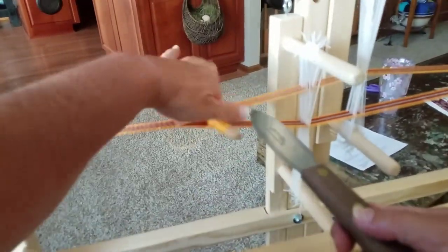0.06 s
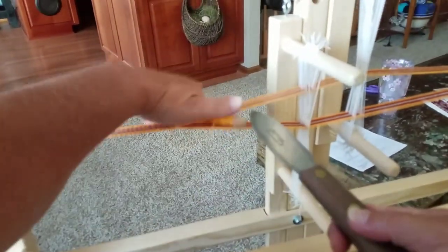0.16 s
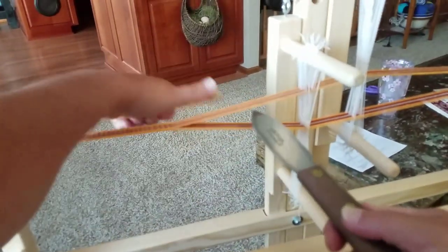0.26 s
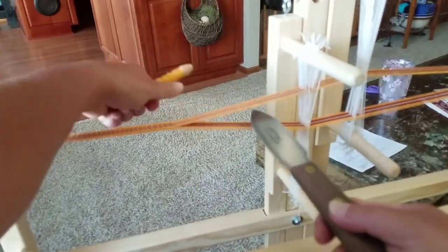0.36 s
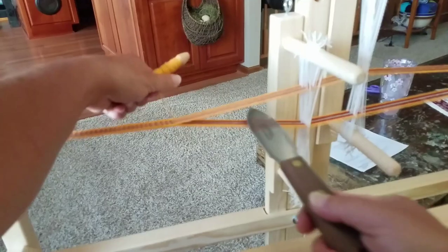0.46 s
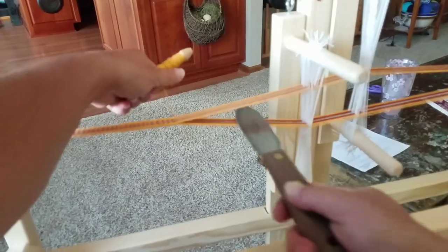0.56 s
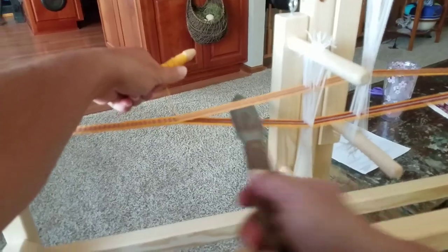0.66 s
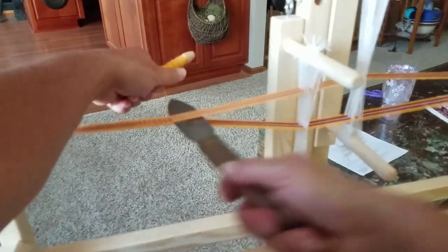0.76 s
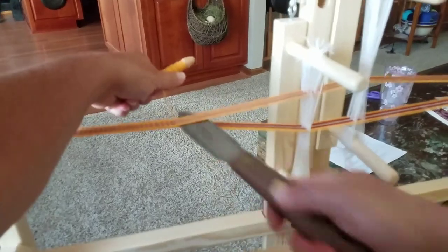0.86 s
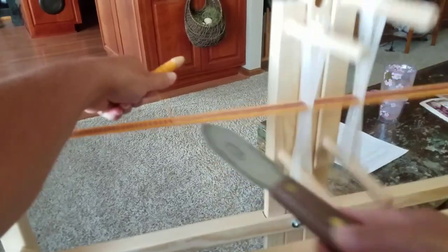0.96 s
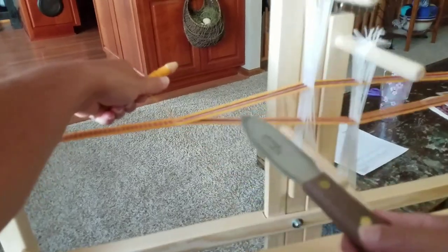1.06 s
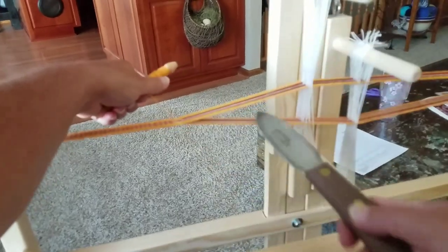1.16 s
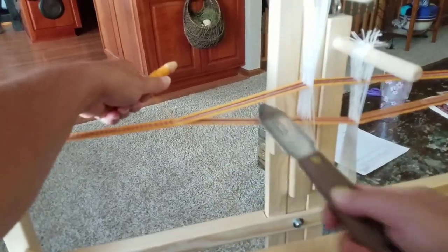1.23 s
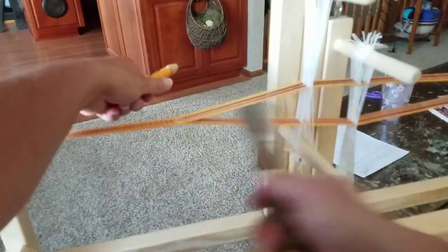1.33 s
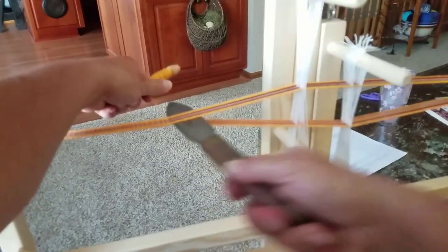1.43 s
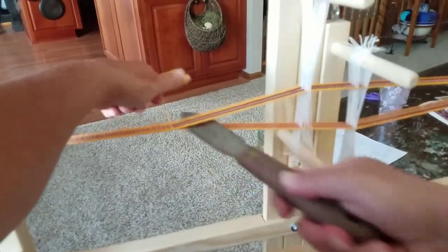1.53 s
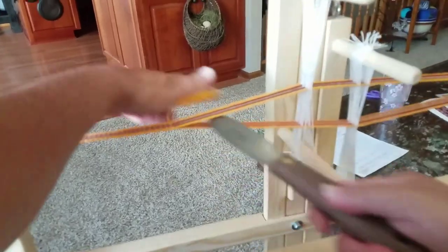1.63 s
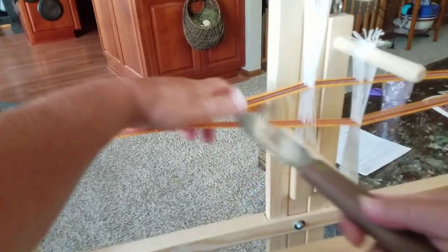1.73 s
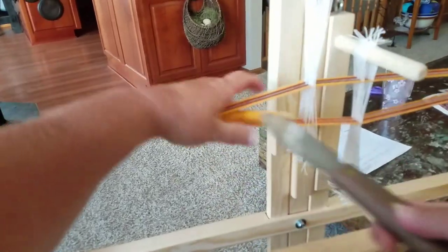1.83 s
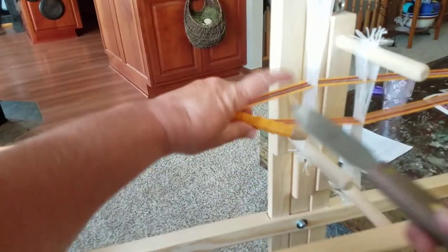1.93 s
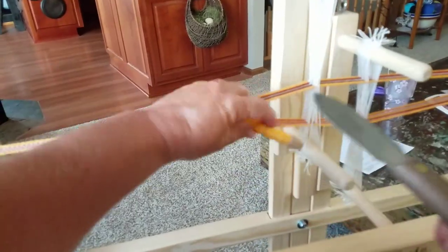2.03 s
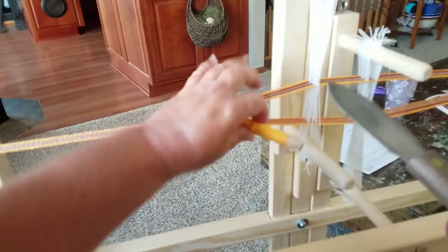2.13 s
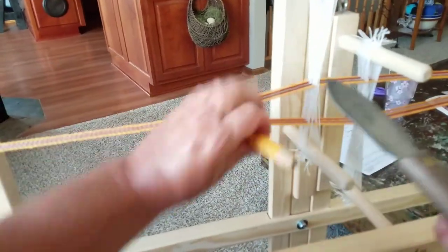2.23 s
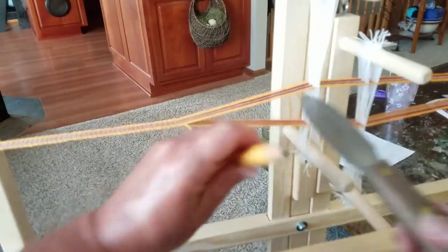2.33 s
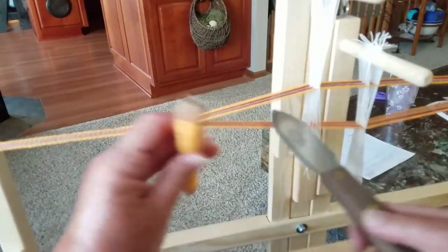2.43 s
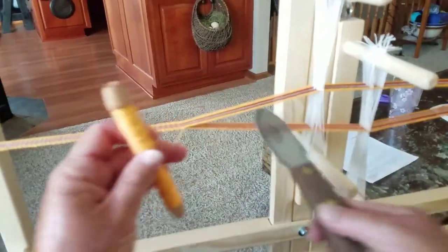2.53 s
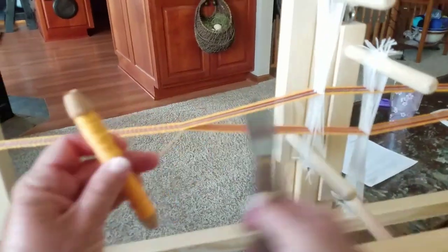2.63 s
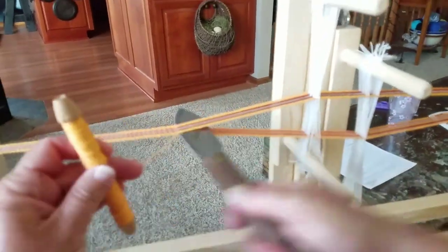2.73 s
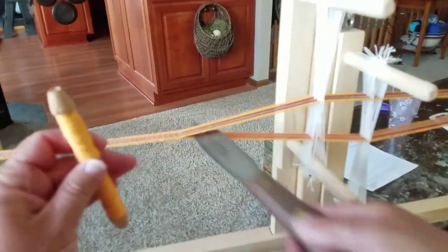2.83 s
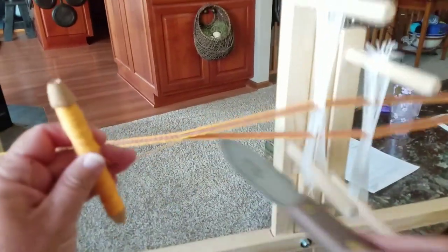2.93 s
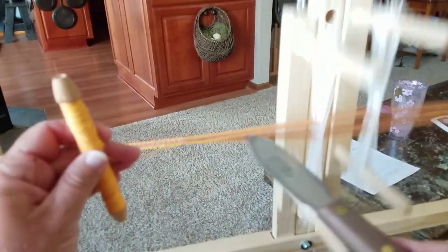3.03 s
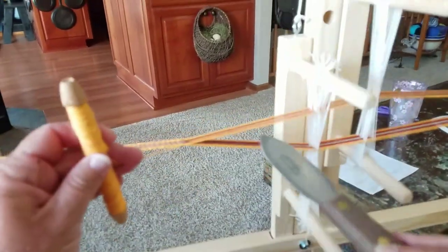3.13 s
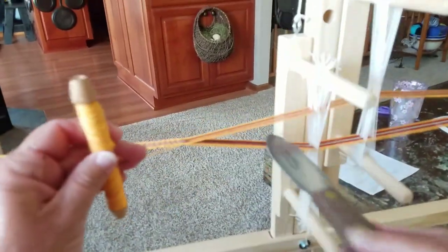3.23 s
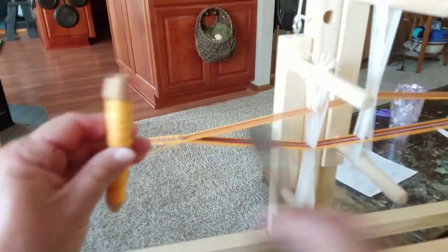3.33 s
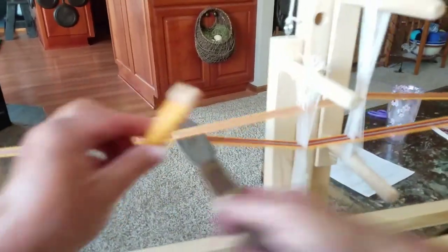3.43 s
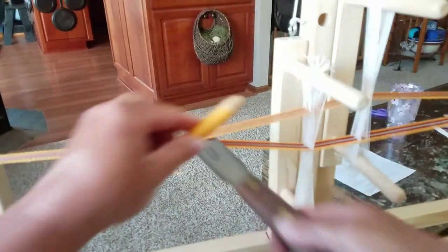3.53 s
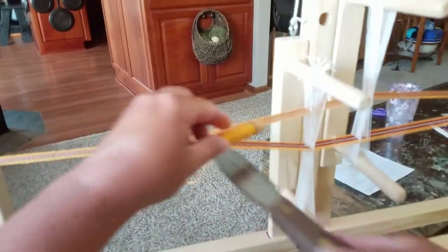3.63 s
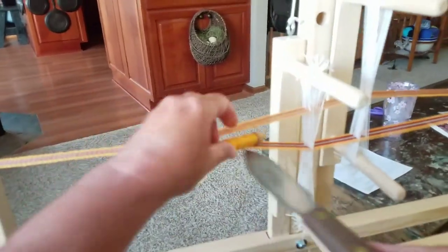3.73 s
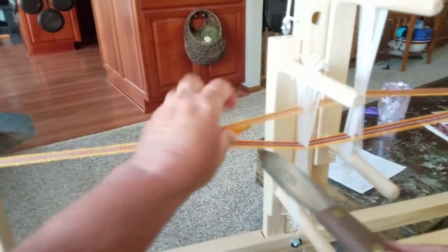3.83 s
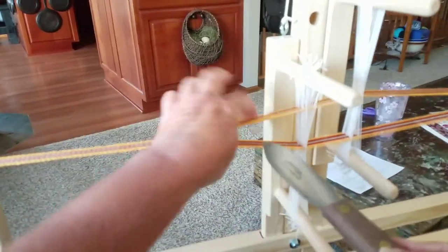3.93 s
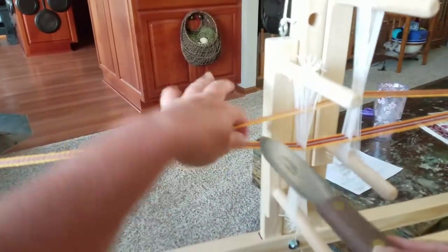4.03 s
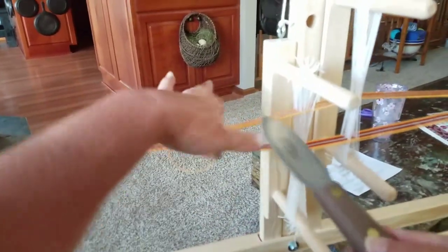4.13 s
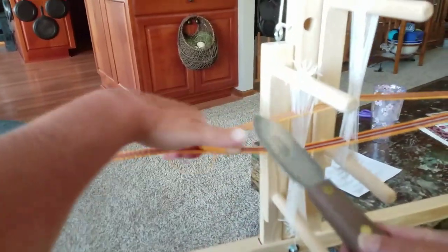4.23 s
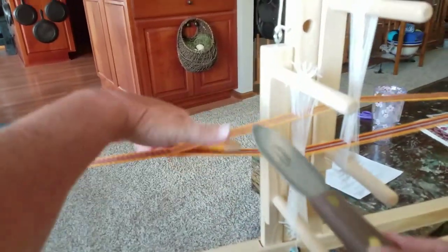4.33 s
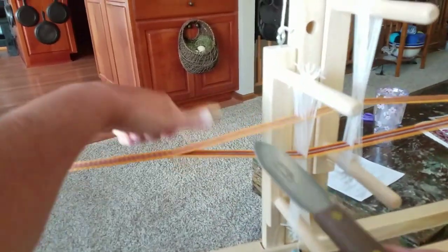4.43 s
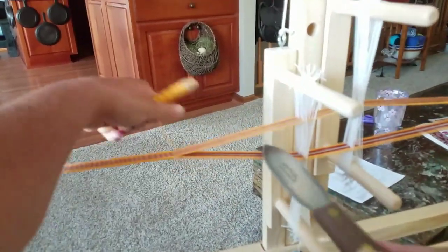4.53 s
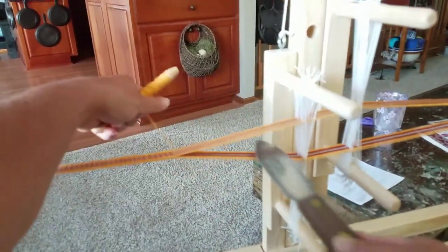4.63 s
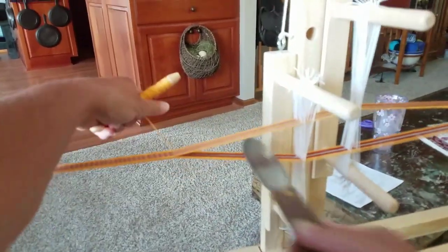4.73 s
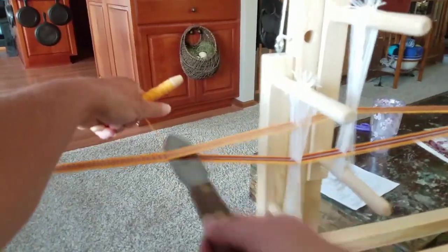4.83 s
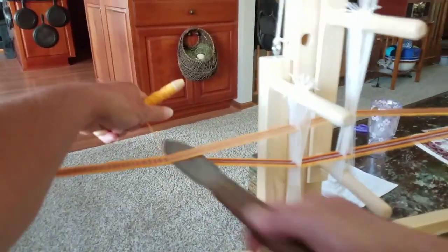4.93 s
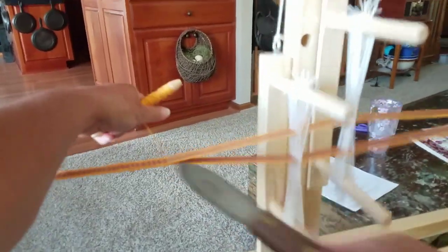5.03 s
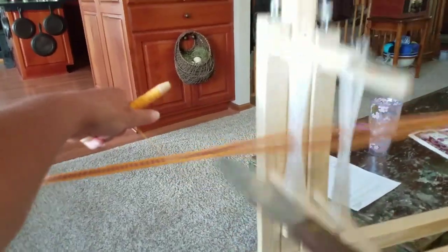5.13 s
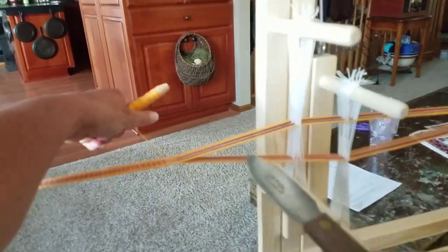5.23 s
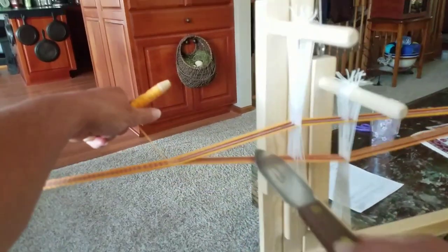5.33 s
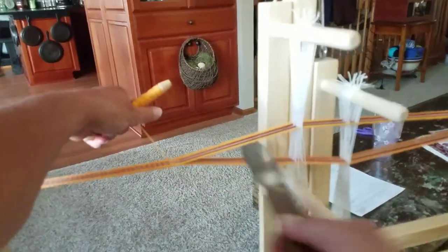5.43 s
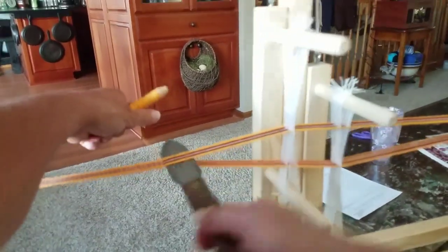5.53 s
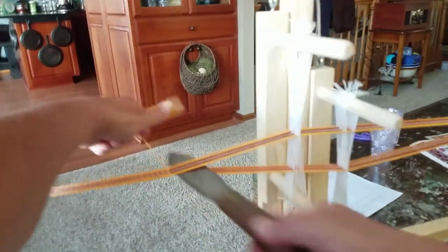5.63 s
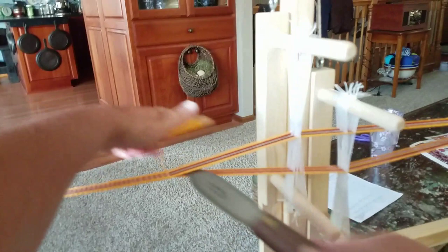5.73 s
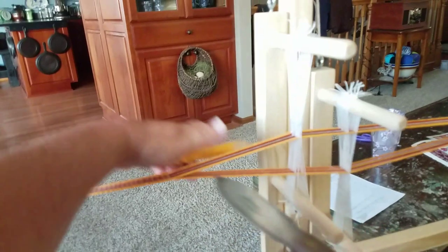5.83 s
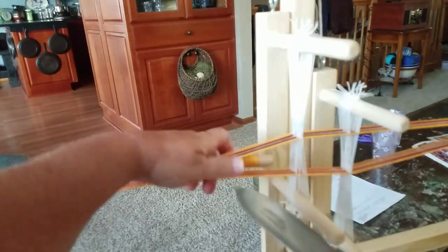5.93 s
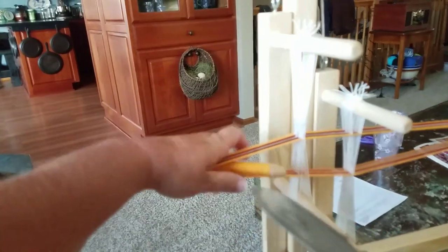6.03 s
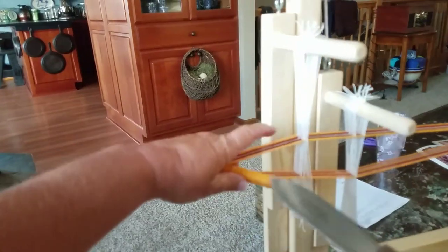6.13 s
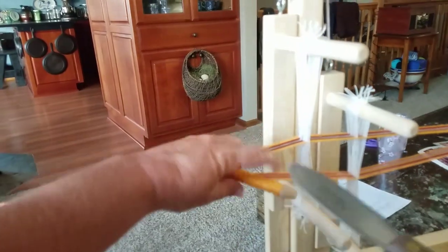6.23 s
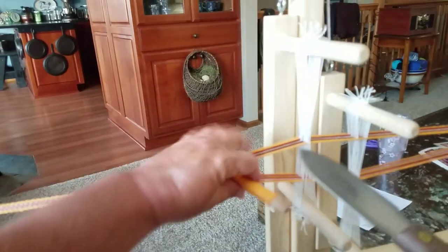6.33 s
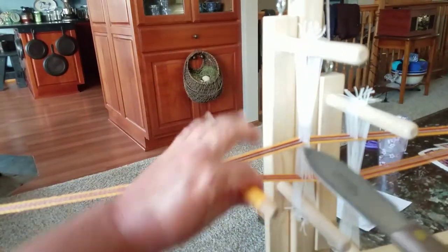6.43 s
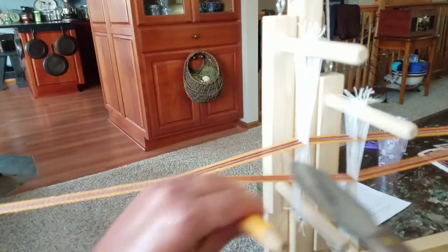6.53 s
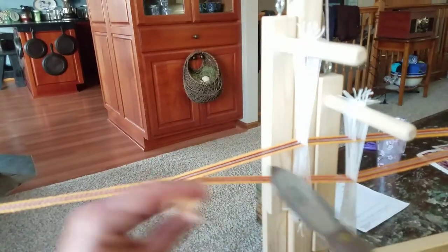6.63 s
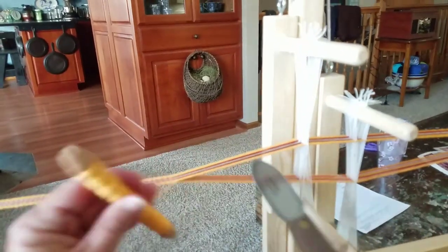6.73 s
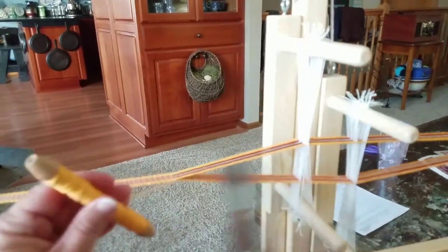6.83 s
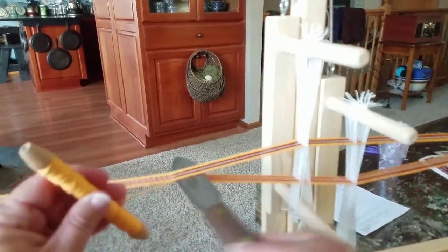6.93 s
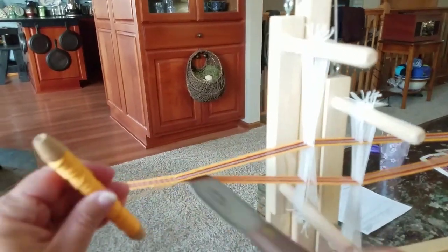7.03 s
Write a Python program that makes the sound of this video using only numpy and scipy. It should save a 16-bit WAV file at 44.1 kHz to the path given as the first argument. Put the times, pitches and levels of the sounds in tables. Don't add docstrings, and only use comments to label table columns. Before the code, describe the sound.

Seven dry beats on a wooden hand loom, the first hardest, each a quick swish ending in a woody crack with a short rattling ring and brief low tail. Three fitful wooden rubs with small knocks fall between paired beats. Low thread rubbing, airy brushes, thin blade ticks and a soft double shuttle knock near the end fill the gaps. Close stereo phone pickup, treble slightly left, over a very faint room hum.

```python
import sys
import numpy as np
from scipy import signal
from scipy.fft import rfft, irfft
from scipy.io import wavfile
from scipy.ndimage import uniform_filter1d

SR = 44100
rng = np.random.default_rng(int(sys.argv[2]) if len(sys.argv) > 2 else 0)


def volts_from_db(level):
    exponent = np.asarray(level, float) / 20
    return 10 ** exponent


def put_to_file(sound):
    columns = np.atleast_2d(sound).T
    safe = np.clip(columns, -1, 1)
    whole_steps = np.round(safe * 32767)
    wavfile.write(sys.argv[1], SR, whole_steps.astype(np.int16))


N = 311346
HZ = np.maximum(np.arange(N // 2 + 1) * SR / N, 1)
CONTACT_S = 0.02


def on_hz(table):
    hz, value = np.transpose(table)
    return np.interp(np.log(HZ), np.log(hz), value)


def unit(x):
    return x / np.sqrt(np.mean(x ** 2))


# f/Hz, left-right likeness [0-1]
LIKENESS = [(60, 0.94), (600, 0.54), (1500, 0), (4000, 0.12), (8000, 0)]


def friction_noise(grit_db=0., slip_db=0.):
    grit = np.repeat(np.minimum(rng.exponential(size=N // 32 + 1), 3), 32)[:N]
    slips = np.repeat(rng.standard_normal(N // 300 + 1), 300)[:N]
    slips = uniform_filter1d(slips, 150)
    noise = rng.standard_normal((2, N)) * volts_from_db(grit_db * grit + slip_db * slips)
    mid, side = rfft(noise)
    alike = np.clip(on_hz(LIKENESS), 0, 1)
    ears = np.array([[1], [-1]])
    return irfft(np.sqrt(1 + alike) * mid + np.sqrt(1 - alike) * side * ears, N)


def colour(x, spectrum):
    return unit(irfft(rfft(x) * volts_from_db(on_hz(spectrum)), N))


def resonate(x, peaks):
    gain = sum(volts_from_db(db) / (1 + 1j * (HZ ** 2 - hz ** 2) / (HZ * width)) for hz, width, db in peaks)
    return unit(irfft(rfft(x) * gain, N))


def ring(modes, damp=0.82, tilt_db=0., rise=0.0019, spread=0.7):
    hz, db, t60 = np.array(modes).T[:, :, None]
    t = np.arange(SR // 3) / SR
    chance = rng.standard_normal((5, len(modes), 1))
    gain = volts_from_db(db + tilt_db * np.log2(hz / 600) + 1.5 * chance[0])
    turn = spread * np.minimum(hz / 600, 4) * chance[1]
    decay = np.exp(-np.log(1000) * t / (damp * t60))
    push = 1 - np.exp(-(t / rise) ** 2)
    angle = 2 * np.pi * hz * (1 + chance[2] / 100) * t + np.pi * chance[4]
    out = []
    for ear in (1, -1):
        partials = volts_from_db(ear * chance[3]) * gain * decay * push * np.sin(angle + (ear > 0) * turn)
        out.append(partials.sum(axis=0))
    out = np.array(out)
    return out / np.abs(out).max()


def add(out, s, x):
    i = int(s * SR)
    out[:, i:i + x.shape[1]] += x[:, :N - i]


def burst(t, s, rise, fall):
    return np.exp(np.where(t < s, (t - s) / rise, (s - t) / fall))


def lean(x, balance):
    return irfft(rfft(x) * volts_from_db(np.array([[.5], [-.5]]) * on_hz(balance)), N)


# f/Hz, spectral level/dB per Hz
ROOM = [(12, -20), (25, -5), (60, -14.5), (80, -9.5), (140, -5), (340, -6), (620, -8.5), (1240, -15.5),
        (2500, -16.5), (5000, -24), (8000, -25.5), (10000, -28.5), (13000, -21), (15000, -27.5)]
# f/Hz, left minus right/dB
ROOM_LEAN = [(60, -2), (110, 3.5), (200, -2), (380, 0), (700, 1.5), (1290, -2), (2380, 2.5), (4400, 2.5),
             (8120, 5), (15000, 0)]


def room_hum():
    return lean(volts_from_db(-66) * colour(friction_noise(), ROOM), ROOM_LEAN)


# f/Hz, width/Hz, level/dB
WARP = [(225, 120, -20), (366.3, 81, 18), (502, 190, -8)]
# f/Hz, width/Hz, level/dB
SCRAPE = [(896, 356, 5.5), (1174, 76, 2), (2110, 560, -6.5)]
# f/Hz, spectral level/dB per Hz
HISS = [(2000, -16), (3500, -8), (5600, -9.5), (8000, -2), (9800, -17), (11500, -5), (13500, -4),
        (15000, -4)]
# from t/s, to t/s, level/dB
PULLS = [(0.3, 0.55, -79), (0.604, 0.72, -67), (0.806, 0.92, -60.5), (1.211, 1.376, -66.5),
         (1.443, 1.57, -66.5), (1.65, 1.746, -74), (2.034, 2.257, -76), (2.4, 2.683, -66.5),
         (2.76, 2.853, -59), (3.13, 3.383, -61.5), (3.487, 3.645, -63), (3.835, 3.95, -73),
         (4.08, 4.443, -61), (4.5, 4.576, -71), (4.746, 4.844, -67.5), (4.92, 5.0, -65),
         (5.035, 5.077, -61), (5.133, 5.192, -52), (5.284, 5.35, -69.5), (5.47, 5.514, -64),
         (5.573, 5.62, -56.5), (5.755, 6.05, -63), (6.15, 6.19, -69.5), (6.295, 6.493, -70.5),
         (6.742, 6.783, -61), (6.96, 7.064, -58.5)]
# t/s, fade/s, scrape level/dB, hiss level/dB
BRUSHES = [(0.06, 0.099, -80, -73), (0.196, 0.013, -61.5, -70), (0.85, 0.067, -59.5, -73),
           (0.945, 0.031, -55.5, -61), (1.204, 0.01, -75, -88), (1.512, 0.037, -56.5, -67),
           (1.634, 0.016, -71, -84), (1.684, 0.022, -71, -74), (2.096, 0.03, -72.5, -79),
           (2.228, 0.085, -73, -69.5), (2.82, 0.025, -64, -61.5), (2.95, 0.027, -63, -68),
           (3.342, 0.03, -78, -73), (3.524, 0.075, -64.5, -63), (3.868, 0.058, -69.5, -70),
           (4.016, 0.026, -78, -74), (4.1, 0.055, -69, -69), (4.24, 0.017, -66, -61),
           (4.352, 0.035, -62.5, -65.5), (4.81, 0.035, -70, -73), (4.978, 0.054, -63, -63),
           (5.49, 0.02, -68, -80), (5.664, 0.041, -64.5, -62), (5.76, 0.034, -70, -87),
           (6.342, 0.03, -67.5, -72), (6.474, 0.035, -54.5, -78), (6.755, 0.034, -72, -73),
           (7.01, 0.027, -69, -59.5)]


def hands():
    t = np.arange(N) / SR
    attack_s, release_s, fidget = 0.019, 0.041, volts_from_db(-80)
    pull, scrape, hiss = np.zeros((3, N))
    for start, end, db in PULLS:
        swell = burst(np.minimum(t, start), start, attack_s, 1)
        fade = burst(np.maximum(t, end), end, 1, release_s)
        pull += volts_from_db(db) * np.minimum(swell, fade)
    for s, fade_s, scrape_db, hiss_db in BRUSHES:
        stroke = burst(t, s, fade_s, fade_s)
        scrape += volts_from_db(scrape_db) * stroke
        hiss += volts_from_db(hiss_db) * stroke
    scrape += volts_from_db(-20) * pull + fidget
    out = (pull + fidget) * resonate(friction_noise(grit_db=2), WARP)
    out += scrape * resonate(friction_noise(grit_db=2.5, slip_db=3.0), SCRAPE)
    return out + hiss * colour(friction_noise(grit_db=2.0), HISS)


# t/s, level/dB
KNOCKS = [
    (0.19, -58),
    (1.518, -55),
    (2.42, -70),
    (2.92, -64),
    (6.475, -53.5),
    (6.741, -52),
    (6.748, -47),
]
# f/Hz, level/dB, t60/s
SHUTTLE = [(327, -4.5, 0.13), (474, 4, 0.061), (584, 3.5, 0.1), (770, 2, 0.033), (995, -6, 0.1),
           (1222, -12, 0.1)]


def shuttle_knocks():
    out = np.zeros((2, N))
    for s, db in KNOCKS:
        add(out, s, volts_from_db(db + 4.5) * ring(SHUTTLE, rise=0.0039))
    return out


# t/s, blow level/dB, rebound level/dB, brightness/dB per octave, tail level/dB
BEATS = [
    (0.74, -17, 7, -6, -10),
    (1.396, -26, 16.5, -3.5, -5.5),
    (2.704, -23, 22, -14, -2.5),
    (3.398, -29, -15, -5, -5.5),
    (4.857, -20.5, 15, -7, -6),
    (5.525, -30, 19, -3, -3),
    (6.894, -20, 15, -13, -6.5),
]
# f/Hz, spectral level/dB per Hz
SWISH = [(240, -6), (400, 1.5), (1020, 4), (1590, -3.5), (2290, 3), (5680, -12), (7240, -8), (12300, -14.5),
         (15000, -10)]


def swish():
    t = np.arange(N) / SR
    gain = sum(volts_from_db(-46 - 0.16 * db) * burst(t, s, 0.016, 0.008) for s, db, *_ in BEATS)
    return gain * colour(friction_noise(grit_db=-3.5), SWISH)


# t/s, knock f/Hz, crack level/dB, rebound crack level/dB, loose peg level/dB
CRACKS = [
    (0.738, 688, -19, -31, -6),
    (1.395, 760, -24, -18, -18),
    (2.705, 678, -13.5, -20, -15),
    (3.402, 720, -33, -31, -28),
    (4.858, 658, -15, -23, -6),
    (5.526, 740, -15, -14, -8),
    (6.894, 668, -17, -21.5, -25),
]
# f/Hz, spectral level/dB per Hz
CRACK = [(600, -26), (1500, 18.5), (2500, 16.5), (3000, 13.5), (4200, 7.5), (7500, -6.5), (10000, -19),
         (14000, -14)]
# f/Hz, spectral level/dB per Hz
TAIL = [(40, -52), (80, -30), (130, -3.5), (230, -3), (400, -1.5), (620, -1), (900, -10), (1250, -8),
        (1500, -21.5), (2200, -21), (4200, -26.5), (9000, -42), (15000, -37)]


def cracks():
    t, out = np.arange(N) / SR, np.zeros((2, N))
    crack = colour(friction_noise(grit_db=2.0), CRACK)
    shudder = colour(friction_noise(grit_db=-1.5), TAIL)
    peg = [(1013, 1, 0.042), (1560, 0, 0.057), (1655, 2.5, 0.039), (2780, -4, 0.03), (3100, -9, 0.025)]
    for (s, hz, crack_db, rebound_db, peg_db), (_, db, *_) in zip(CRACKS, BEATS):
        knock = [(hz, 0, .07), (1.305 * hz, -5, .05)]
        add(out, s, volts_from_db(db - 5.5) * ring(knock, rise=0.00085))
        out += volts_from_db(db + crack_db) * crack * burst(t, s + 0.0016, 0.00014, 0.0055)
        out += volts_from_db(db + rebound_db) * crack * burst(t, s + 0.85 * CONTACT_S, .0007, 0.011)
        out += volts_from_db(db - 28.5) * shudder * burst(t, s + 0.066, 0.0077, 0.039)
        add(out, s + 0.55 * CONTACT_S, volts_from_db(db + peg_db) * ring(peg, rise=0.0017))
    return out


# f/Hz, level/dB, t60/s
FRAME = [(336.3, -5.5, 0.22), (485.5, 4.5, 0.08), (560, -20, 0.75), (713, 11, 0.093), (874, -28, 0.37),
         (793, 16.5, 0.02), (954, 0, 0.29), (1080, 2, 0.083), (1221, -5, 0.36), (1710, 13, 0.02),
         (1966, -5.5, 0.27), (2347, -7.5, 0.082), (2300, -28.5, 0.61), (2852, -14, 0.13), (4230, -56, 0.22),
         (4080, -38, 0.068)]
# f/Hz, level/dB, t60/s
THUD = [(44.7, -3.5, 0.57), (107.2, -5.5, 0.38), (183.3, -8.5, 0.55), (233.6, 14.5, 0.19), (403, 3, 0.27)]
# f/Hz, level/dB, t60/s
BLADE = [(1030, 9, 0.032), (1700, -8, 0.014), (2073, 9.5, 0.017), (2480, -0.5, 0.028), (2756, 0.5, 0.027),
         (4220, 1.5, 0.024), (5410, -7.5, 0.031)]


def blows():
    out, t = np.zeros((2, N)), np.arange(N) / SR
    tail = colour(friction_noise(grit_db=3), TAIL)
    release = np.minimum((t[:SR // 2] - 0.75 * CONTACT_S) / 0.0012, 50)
    held = 0.32 + 0.54 / (1 + np.exp(release))
    for s, db, rebound_db, tilt_db, tail_db in BEATS:
        blow = np.zeros((2, SR // 2))
        add(blow, 0, ring(FRAME, 0.7, tilt_db, rise=0.0013))
        add(blow, 0.35 * CONTACT_S, volts_from_db(0.5) * ring(FRAME, 0.28, tilt_db + 13.0, rise=0.00026))
        add(blow, 0.6 * CONTACT_S, volts_from_db(-0.5) * ring(FRAME, 0.28, tilt_db + 3.5, rise=0.0024))
        cushioned = np.tanh(1.81 * blow) / 1.72
        add(out, s - 0.001, volts_from_db(db + 3.5) * cushioned * held)
        add(out, s, volts_from_db(0.4 * db - 29.0) * ring(THUD, rise=0.0089))
        add(out, s + 0.64 * CONTACT_S, volts_from_db(db + rebound_db - 25.5) * ring(BLADE, 1.0))
        after = np.maximum(t - s, 0)
        decay = (1 - np.exp(-after / 0.013)) * np.exp(-np.log(1000) * after / 0.32)
        out += volts_from_db(db + tail_db - 6.5) * tail * decay
    return out


# t/s, level/dB, thread snap level/dB, strongest ring f/Hz
TICKS = [(0.853, -43, -72, 1500), (1.514, -35.5, -76, 3300), (2.615, -60, -68, 2500),
         (3.0391, -29, -61, 3400), (3.4977, -42.5, -79, 2100), (3.5996, -59, -67, 5000),
         (3.8521, -51, -73, 2800), (4.0848, -36, -67.5, 3980), (4.9922, -43.5, -73, 2400),
         (5.254, -51, -72, 4800), (5.6501, -38, -72, 2500), (5.7289, -39, -81, 2300),
         (6.477, -51, -82, 2800), (6.7408, -56, -64.5, 1100)]


def blade_ticks():
    out = np.zeros((2, N))
    snap = [(3450, -17, 0.0042), (5500, 5, 0.0043), (7400, 3, 0.0058), (11000, 2, 0.0062), (13200, 14, 0.0028)]
    for s, db, snap_db, touch_hz in TICKS:
        touched = [(hz, g - 3.5 * np.log2(hz / touch_hz) ** 2, t60) for hz, g, t60 in BLADE]
        add(out, s, volts_from_db(db - 1.5) * ring(touched, 0.7, rise=0.0003))
        add(out, s, volts_from_db(snap_db + 21.5) * ring(snap, rise=0.0001))
    return out


# t/s, level/dB, speeding up/s, slowing down/s
SHEDS = [
    (1.03, -41, 0.1, 0.098),
    (3.045, -43.5, 0.14, 0.11),
    (5.151, -41.5, 0.14, 0.098),
]


def slide(db, lost_db, roundness):
    t, gain = np.arange(N) / SR, np.zeros(N)
    for s, peak_db, up, down in SHEDS:
        away = np.minimum(np.where(t < s, (s - t) / up, (t - s) / down), 4)
        gain += volts_from_db(peak_db + db - lost_db * away ** roundness)
    return gain


# f/Hz, width/Hz, level/dB
BARS = [(242, 100, -11), (415, 77, -10.5), (532, 43, 7), (770, 340, -2.5), (1157, 123, 4), (1720, 130, 2.5),
        (2137, 44, 4.5), (2540, 150, -1.5), (3240, 28, -8), (2370, 630, -42)]
# t/s, level/dB
BAR_KNOCKS = [
    (1.023, -24.5),
    (1.043, -51),
    (1.061, -32.5),
    (3.02, -35),
    (3.038, -30.5),
    (5.134, -33.5),
    (5.148, -29),
    (5.165, -33.5),
]


def heddles():
    low = [peak for peak in BARS if peak[0] < 900]
    high = [peak for peak in BARS if peak[0] >= 900]
    groan = resonate(friction_noise(grit_db=1.5, slip_db=1.5), low)
    rub = resonate(friction_noise(grit_db=3, slip_db=1.0), high)
    hiss = colour(friction_noise(grit_db=0, slip_db=-5.2), HISS)
    out = slide(db=0.1, lost_db=18, roundness=1.51) * groan
    out += slide(db=-2.5, lost_db=21, roundness=1.37) * rub
    out += slide(db=-17.5, lost_db=23, roundness=4.3) * hiss
    bar = [(532.5, -2, 0.094), (1130, -15, 0.028), (2075, -14.5, 0.13)]
    for s, db in BAR_KNOCKS:
        add(out, s, volts_from_db(db + 0.5) * ring(bar, rise=0.0029))
        add(out, s, volts_from_db(-50.5) * ring(THUD, 0.45, rise=0.041))
    return out


# f/Hz, left minus right/dB
LOOM_LEAN = [(60, -11), (110, 0), (200, 0), (380, 0.5), (700, 2), (1290, 2.5), (2380, 3.5), (4400, 3.5),
             (8120, 11.5), (15000, 10)]


def scene():
    loom = hands() + shuttle_knocks() + swish() + cracks() + blows() + blade_ticks() + heddles()
    bass_cut = signal.butter(2, 90, "high", fs=SR, output="sos")
    return lean(signal.sosfilt(bass_cut, loom), LOOM_LEAN) + room_hum()


# from f/Hz, to f/Hz
VANISHING_BANDS = [(8300, 9000), (9000, 9650), (9650, 10300), (10300, 10900)]


def drop_weak_treble(x):
    def level(v):
        return 10 * np.log10(uniform_filter1d((v ** 2).mean(axis=0), size=1024) + 1e-14)

    threshold_db, softness_db = 32.5, 0.6
    spectrum, whole, lost = rfft(x), level(x), np.zeros_like(x)
    for lo, hi in VANISHING_BANDS:
        band = irfft(spectrum * ((HZ > lo) & (HZ <= hi)), N)
        excess = (threshold_db - whole + level(band)) / softness_db
        lost += band / (1.5 + np.exp(np.clip(excess, -30, 30)))
    return x - lost


def roll_off(x):
    return signal.sosfilt(signal.butter(12, 15720, fs=SR, output="sos"), x)


def record(dry):
    low_pass = signal.ellip(10, 0.2, 70, 14700, fs=SR, output="sos")
    mix = drop_weak_treble(signal.sosfilt(low_pass, dry)) - 0.0005
    return roll_off(mix)


dry = scene()
out = record(dry)
put_to_file(out)
```